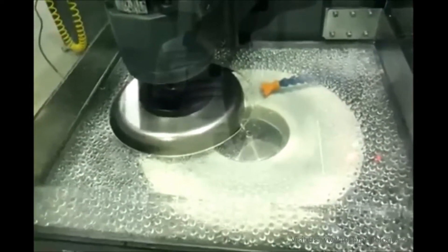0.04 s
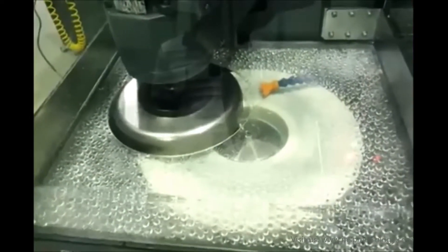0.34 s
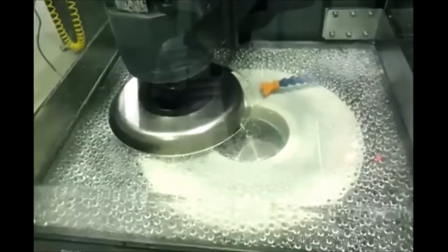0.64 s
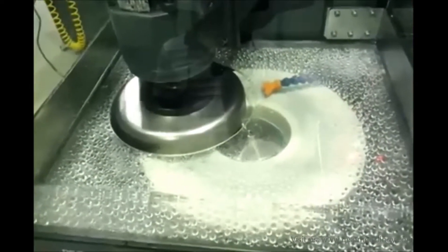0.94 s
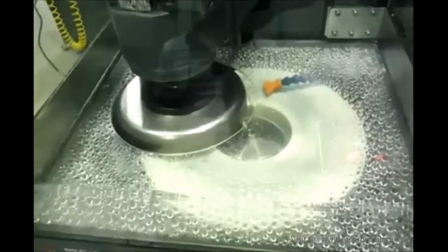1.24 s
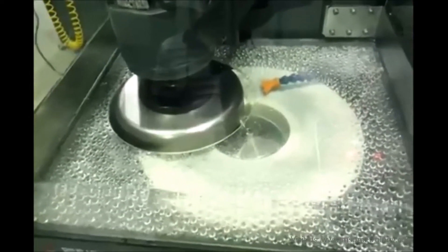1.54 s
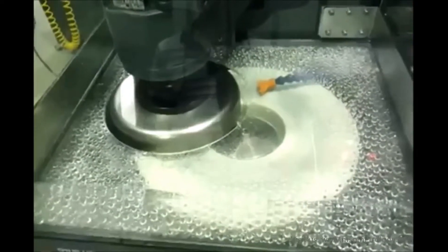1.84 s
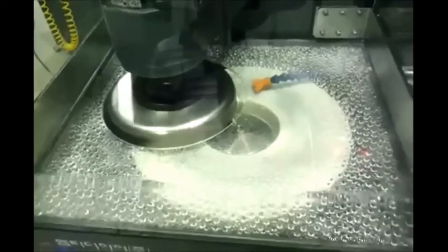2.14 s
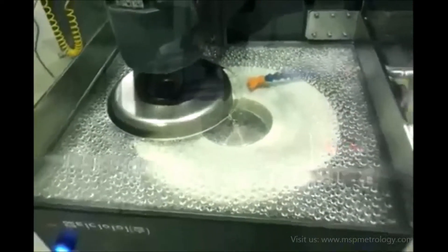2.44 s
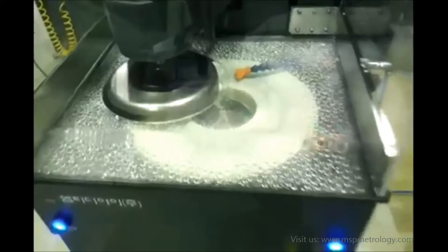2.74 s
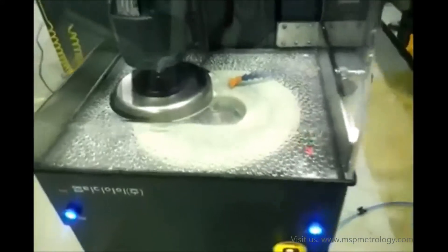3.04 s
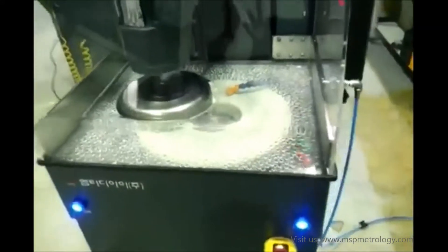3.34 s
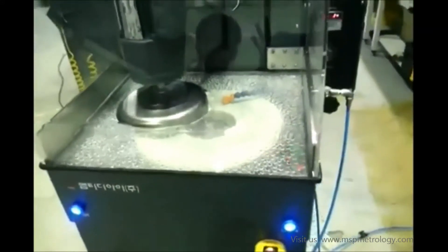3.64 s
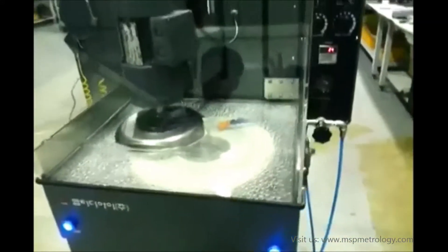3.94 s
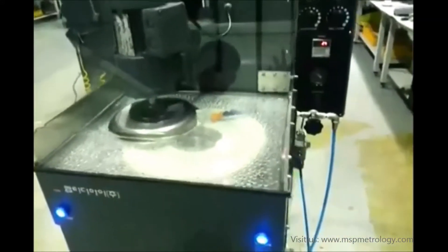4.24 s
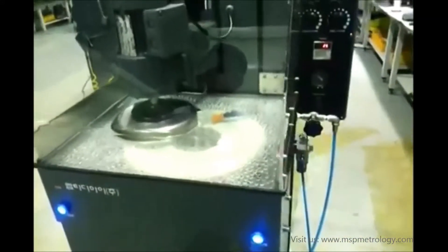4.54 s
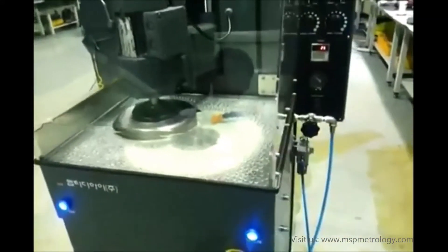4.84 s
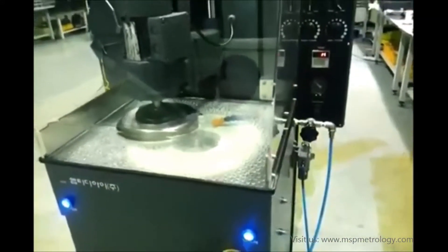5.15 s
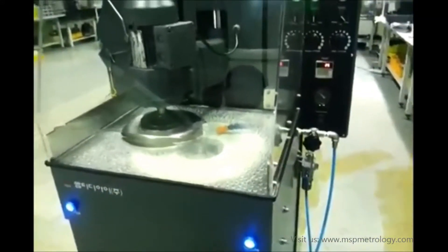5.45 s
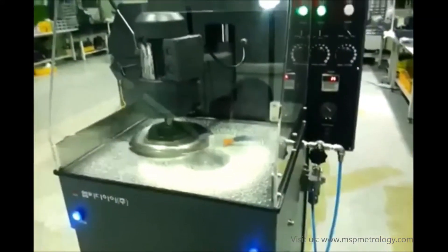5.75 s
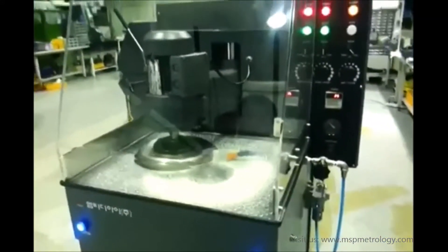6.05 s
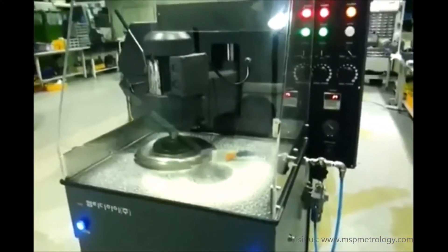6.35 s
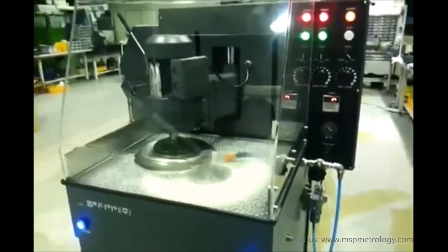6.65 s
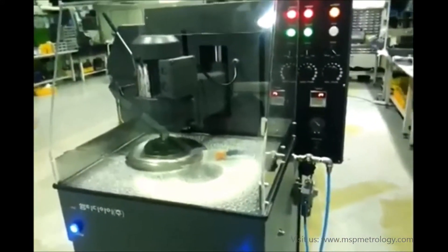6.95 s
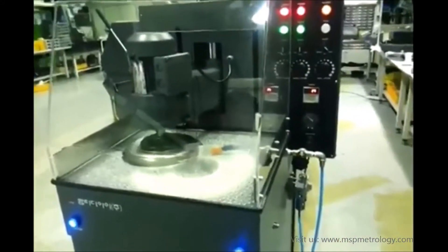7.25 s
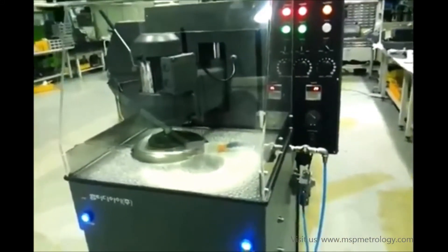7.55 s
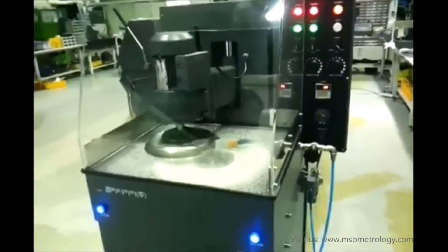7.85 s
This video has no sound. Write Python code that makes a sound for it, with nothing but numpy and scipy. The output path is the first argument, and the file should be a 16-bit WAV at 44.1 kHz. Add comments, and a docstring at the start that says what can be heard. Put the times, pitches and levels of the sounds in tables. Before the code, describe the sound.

A large polishing machine runs in a workshop with a throbbing gear hum, a high motor whine and wet, squeaky rubbing.

```python
"""A lapping machine polishes under running slurry in a workshop. From the start its geared drive hums,
throbs and rattles once a turn, the inverter makes the motor whine at 6 and 9 kHz, a fan sings, and the
wet plate rubs, scrapes and squeaks inside a ringing steel tub. From about 2 to 5 s the listener steps
back from the plate, and the whine swells and fades. One sharp tick at 4.9 s; the machine runs on."""
import sys
import numpy as np
from scipy.fft import rfft, irfft, next_fast_len
from scipy.io import wavfile
from scipy.ndimage import map_coordinates

SR = 44100
rng = np.random.default_rng(int(sys.argv[2]) if len(sys.argv) > 2 else 0)


def file_out(sig):
    """Save sig as 16-bit WAV at sys.argv[1]."""
    # one column per channel
    cols = np.atleast_2d(sig).T
    # limit, then scale
    lim = np.clip(cols, -1, 1)
    pcm = np.round(lim * 32767).astype(np.int16)
    wavfile.write(sys.argv[1], SR, pcm)


N = 348831
TIME_S = np.arange(N) / SR
SHAFT_HZ, FIRST_TURN_S = 10.1225, .01


def amp(db):
    return 10 ** (np.asarray(db) / 20)


def curve(rows):
    """Rows of (seconds, value), interpolated to every sample."""
    return np.interp(TIME_S, *np.transpose(rows))


def wobble(knots_per_s):
    """Smooth random curve."""
    knots = rng.standard_normal(int(N * knots_per_s / SR) + 4)
    coarse_s = np.linspace(0, N / SR, 2000)
    return np.interp(TIME_S, coarse_s, map_coordinates(knots, [coarse_s * knots_per_s]))


def filtered(x, response):
    """Apply a gain given as a function of Hz."""
    size = next_fast_len(N + SR // 4)
    return irfft(rfft(x, size) * response(np.fft.rfftfreq(size, 1 / SR)), size)[..., :N]


def colour(table):
    """Near and back gains of a spectrum table, interpolated on log frequency."""
    knots_hz, *columns_db = np.transpose(table)
    return lambda hz: amp([np.interp(np.log(hz + 1), np.log(knots_hz), db) for db in columns_db])


def blend(noises, response, back):
    """Two noises take the near and back colours and crossfade as the listener moves."""
    near, far = filtered(noises, response) * np.sqrt(SR / 2)
    return near * np.sqrt(1 - back) + far * np.sqrt(back)


def db_at(back, levels_db):
    """Level at the listener, from levels evenly spaced between near and back."""
    return np.interp(back, np.linspace(0, 1, len(levels_db)), levels_db)


def tone(cycles, rms_db, flutter_db):
    """Sine with a fluttering level."""
    return np.sqrt(2) * amp(rms_db + flutter_db * wobble(7)) * np.sin(2 * np.pi * (cycles + rng.random()))


# Frame rumble spectrum. Each row: frequency in Hz, density near and back in dB per Hz.
RUMBLE_SPECTRUM = [(15, -75, -77), (35, -70, -71), (60, -59.5, -61.5), (90, -66, -65.5), (135, -56.5, -61),
                   (195, -71, -73), (260, -66, -66), (380, -71, -73), (700, -75, -77), (1500, -100, -100)]

def frame_rumble(back):
    """The frame rumbles under the plate."""
    return blend(rng.standard_normal((2, N)), colour(RUMBLE_SPECTRUM), back)


# Steady tones: low drive tones, and weak inverter tones near 6, 9 and 12 kHz. Each row: frequency in Hz,
# flutter in dB, level near and back in dB.
STEADY_TONES = [(130, 1.5, -37, -49), (133.1, 2, -43, -45), (270, 1, -47, -50), (310.5, 1, -49, -54),
                (5924, 4, -45, -53), (6026, 4, -43, -53), (6282, 4, -55, -49), (6438.7, 4, -48, -44),
                (8974, 4, -56, -53), (9026, 4, -57, -53), (9131, 4, -58, -52), (11950, 1.5, -69, -60),
                (12050, 1.5, -69, -61), (12386, 1, -60, -62)]

def steady_tones(back):
    """Drive and inverter hold faint tones of steady pitch."""
    return sum(tone(hz * TIME_S, db_at(back, levels_db), flutter_db)
               for hz, flutter_db, *levels_db in STEADY_TONES)


# Fan level. Each row: time in seconds, level in dB.
FAN_LEVEL = [(0, -39), (1, -37.8), (2, -38.8), (2.6, -41), (3.25, -38.3), (3.6, -42), (4, -40.7),
             (4.4, -45), (5, -47), (6.5, -54), (7.2, -47), (7.9, -45)]
# Fan tones. Each row: frequency in Hz, offset from the fan level in dB.
FAN_PARTIALS = [(1465, -7), (1471.1, -5.5), (1477.6, -2)]

def fan():
    """Three close fan tones beat gently together."""
    return sum(tone(hz * TIME_S, curve(FAN_LEVEL) + db, flutter_db=.5) for hz, db in FAN_PARTIALS)


# Sharp ticks. Each row: start in seconds, peak in dB.
TICK_EVENTS = [(4.8686, -8)]

def tick(low_hz=5800, high_hz=10000, snap_t60_s=.005, tail_t60_s=.05, tail_db=-16):
    """A short, bright snap and its brief answer from the guards."""
    band = lambda hz: 1 / np.sqrt(1 + (low_hz / (hz + 1)) ** 12) / (1 + (hz / high_hz) ** 4)
    out = np.zeros(N)
    for start_s, peak_db in TICK_EVENTS:
        age_s = np.abs(TIME_S - start_s)
        decay = amp(-60 * age_s / snap_t60_s) + amp(tail_db - 60 * age_s / tail_t60_s)
        snap = filtered(rng.standard_normal(N) * (TIME_S >= start_s) * decay, band)
        out += amp(peak_db) * snap / np.abs(snap).max()
    return out


# Tub and guard resonances. Each row: centre and nominal width in Hz, density near and back in dB per Hz.
TUB_MODES = [(805, 42, -81, -84), (929, 34, -60.5, -63), (1187, 85, -61, -61), (1472, 66, -61, -60.5),
             (1764, 25, -53.5, -61.5), (1906, 160, -60.5, -59.5), (2118, 18.6, -51.5, -85),
             (2548, 36, -55, -61), (2770, 250, -70, -63), (3070, 29, -58.5, -58.5), (4360, 190, -67.5, -69)]

def tub_ring(back):
    """Tub and guards ring, excited by the slurry."""
    def response(hz):
        power = sum(amp([[near_db], [far_db]]) ** 2 / (1 + ((hz - mode_hz) / (.53 * width_hz)) ** 2) ** 2
                    for mode_hz, width_hz, near_db, far_db in TUB_MODES)
        return np.sqrt(power)
    return blend(rng.standard_normal((2, N)), response, back) * amp(.69 * wobble(18))


# Wet rubbing spectrum. Each row: frequency in Hz, density near and back in dB per Hz.
RUB_SPECTRUM = [(200, -64, -67.5), (545, -69.5, -72), (840, -68, -64), (1590, -73.5, -70.5),
                (2360, -65, -65), (3240, -66.5, -68), (4000, -66, -65.5), (4960, -69, -68.5),
                (6110, -64.5, -61), (6920, -64, -63.5), (8060, -73, -73), (8950, -71, -69.5),
                (10650, -76.5, -77.5), (10660, -91.5, -89), (12100, -90, -81), (12600, -106, -103),
                (14600, -116, -114)]
# Rubbing strength. Each row: time in seconds, gain on hiss and tub ring in dB.
RUB_GAIN = [(0, .4), (1.5, .4), (2.5, .4), (3.4, .8), (4.4, .4), (5.2, 0), (6.5, -.2), (7.9, -.7)]

def wet_rubbing(turn, back, ripple_db=1.3, swell_db=.72, lead_turns=.17):
    """Slurry hisses under the pad, swelling just before each turn, and excites the tub."""
    def response(hz):
        # Reflections off the guards ripple the spectrum, differently at each place.
        grid_hz = np.arange(0, SR / 2, 45)
        ripple = np.array([np.interp(hz, grid_hz, row) for row in rng.standard_normal((2, len(grid_hz)))])
        return colour(RUB_SPECTRUM)(hz) * amp(ripple_db * ripple)
    swell = amp(swell_db * np.cos(2 * np.pi * (turn + lead_turns)) + .59 * wobble(14))
    hiss = blend(rng.standard_normal((2, N)), response, back) * swell
    return amp(curve(RUB_GAIN)) * (hiss + tub_ring(back))


def stick_slip(events, length_s, width_hz, length_spread=.45):
    """The work sticks and slips: a narrow-band noise burst for each (seconds, Hz, dB)."""
    size = SR // 10
    lag_s, bins_hz = (np.arange(size) - size // 2) / SR, np.fft.rfftfreq(size, 1 / SR)
    out = np.zeros(N + 3 * size)
    for centre_s, hz, db in events:
        burst_s = length_s * np.exp(length_spread * rng.standard_normal())
        envelope = np.exp(-(lag_s / burst_s) ** 2)
        band = np.exp(-((bins_hz - hz) / width_hz) ** 2)
        rasp = irfft(rfft(rng.standard_normal(size)) * band, size) * envelope
        start = size // 2 + round(centre_s * SR)
        out[start:start + size] += amp(db) * rasp * np.linalg.norm(envelope) / np.linalg.norm(rasp)
    return out[size:size + N]


# Scrapes that stand out. Each row: time in seconds, pitch in Hz, level in dB.
SCRAPE_ACCENTS = [(.679, 4300, -32.5), (1.462, 4300, -36), (1.576, 3900, -33), (2.185, 3700, -33.5),
                  (3.32, 4100, -36), (6.322, 4220, -33.5), (6.445, 4350, -33.5), (6.513, 3750, -33),
                  (6.61, 4100, -34.5), (7.292, 4030, -34), (7.4, 4120, -37)]

def scrapes(place_turns=.8, pitch_hz=4000, level_db=-41.5):
    """Grit scrapes under the work late in every turn, each time at its own pitch."""
    times_s = np.arange(FIRST_TURN_S + place_turns / SHAFT_HZ, N / SR, 1 / SHAFT_HZ)
    jitter_s, jitter_hz, jitter_db = rng.normal(0, (.017, 210, 2), (len(times_s), 3)).T
    events = zip(times_s + jitter_s, pitch_hz + jitter_hz, level_db + jitter_db)
    return stick_slip([*events, *SCRAPE_ACCENTS], length_s=.017, width_hz=220)


# Grip of the work on the plate. Each row: time in seconds, level of the turn's first squeak in dB.
GRIP_LEVEL = [(0, -37), (2.35, -38), (2.7, -33.5), (4.1, -35), (5.7, -33.5), (6.3, -34.5), (7.05, -34.5),
              (7.4, -38), (7.9, -39)]
# Squeaks that stand out. Each row: time in seconds, pitch in Hz, level in dB.
SQUEAK_ACCENTS = [(2.579, 1900, -27), (2.632, 1880, -31), (2.695, 1890, -31), (2.773, 1880, -28.5),
                  (2.823, 1890, -28.5), (2.965, 1920, -30), (3.066, 1880, -28.5), (3.225, 1880, -31),
                  (3.369, 1880, -29), (3.49, 1880, -31), (3.572, 1880, -28), (4.048, 1910, -28.5),
                  (4.37, 1960, -31), (4.455, 1890, -30.5), (4.55, 1960, -30), (4.85, 1970, -32.5),
                  (5.048, 1880, -31), (5.148, 1890, -26.5), (5.645, 1930, -30), (6.632, 1990, -32),
                  (6.93, 1870, -31), (7.027, 1880, -30.5)]

def squeaks(pitch_hz=1868, rise_hz_per_s=13.2, second_turns=.46, second_db=-7):
    """The work squeaks twice a turn, as loud as it grips the plate."""
    turns_s = np.arange(FIRST_TURN_S, N / SR, 1 / SHAFT_HZ)
    events = list(SQUEAK_ACCENTS)
    for times_s, offset_db in [(turns_s, 0), (turns_s + second_turns / SHAFT_HZ, second_db)]:
        jitter_s, jitter_hz, jitter_db = rng.normal(0, (.004, 22, .6), (len(times_s), 3)).T
        hz = pitch_hz + rise_hz_per_s * times_s + jitter_hz
        db = np.interp(times_s, *np.transpose(GRIP_LEVEL)) + offset_db - jitter_db
        events += zip(times_s + jitter_s, hz, db)
    return stick_slip(events, length_s=.0094, width_hz=50)


def tooth_knock(turn, back, pitch_hz=530, place_turns=.26, length_s=.019, near_db=-39, far_db=-38):
    """A worn tooth knocks the gearbox at the same place in every turn."""
    lag_s = ((turn - place_turns + .5) % 1 - .5) / SHAFT_HZ
    envelope = amp(db_at(back, (near_db, far_db))) * np.exp(-(lag_s / length_s) ** 2)
    return np.sqrt(2) * envelope * np.sin(2 * np.pi * pitch_hz * lag_s)


# Gear rattle spectrum. Each row: frequency in Hz, density near and back in dB per Hz.
RATTLE_SPECTRUM = [(30, -80, -77.5), (70, -64.5, -65.5), (140, -64, -64.5), (205, -73, -73),
                   (322, -66, -68), (371, -68, -70), (513, -64, -67), (620, -66, -65.5),
                   (900, -64.5, -67.5), (1350, -68.5, -67), (1710, -65.5, -70), (1890, -64.5, -65),
                   (2350, -76, -72), (4000, -114, -118)]
# Gear load. Each row: time in seconds, gain on the rattle in dB.
LOAD_GAIN = [(0, 0), (2.2, 0), (2.9, .8), (3.6, .8), (4.6, 0), (6.6, -.3), (7.9, -1)]

def gear_rattle(turn, back, repeat_share=.8):
    """Much the same tooth faults pass every turn, giving a dense comb of lines."""
    size = int(SR / SHAFT_HZ)
    one_turn = rng.standard_normal((2, size))
    one_turn /= np.sqrt(np.mean(one_turn ** 2, axis=1, keepdims=True))
    faults = one_turn[:, (turn * size).astype(int) % size]
    teeth = np.sqrt(repeat_share) * faults + np.sqrt(1 - repeat_share) * rng.standard_normal((2, N))
    return amp(curve(LOAD_GAIN)) * blend(teeth * amp(1.4 * wobble(25)), colour(RATTLE_SPECTRUM), back)


# Strong gear tones. Each row: multiple of the shaft rate, level near, halfway and back in dB before trim.
GEAR_ORDERS = [(5, -49, -52, -55), (6, -46, -52, -54), (11, -47, -50, -50), (13, -50, -44, -58),
               (14, -53, -46, -55), (15, -40, -39, -38.5), (16, -45, -46, -47), (17, -50, -51, -52),
               (32, -51, -53, -56), (33, -48, -50, -52), (42, -49, -40, -43.5), (44, -47, -57, -59),
               (48, -49, -56, -52), (50, -56, -50, -50), (51, -48, -50, -51), (52, -48, -49, -54),
               (53, -51, -52, -48), (54, -49, -48, -46), (59, -49, -52, -56), (60, -46, -47, -45),
               (70, -44, -45, -52), (71, -56, -48, -49), (72, -56, -47, -51), (74, -55, -46, -56),
               (76, -50, -44, -53), (79, -48, -41, -45), (80, -48, -41, -42.5), (82, -49, -46, -48),
               (85, -51, -57, -52), (92, -46, -49, -48), (93, -47, -53, -52), (94, -34.5, -35.5, -40.5),
               (111, -46, -49, -53), (117, -50, -55, -62), (150, -59, -53, -53), (175, -47, -60, -63),
               (178, -50, -55, -53), (184, -55, -51, -57)]

def gear_tones(turn, back, drift_cycles=.07, trim_db=-.15):
    """Strong shaft harmonics drift against each other as the listener moves."""
    return sum(tone(order * turn + drift_cycles * back * wobble(4),
                    db_at(back, levels_db) + trim_db, flutter_db=1)
               for order, *levels_db in GEAR_ORDERS)


# Where the gears bind or run slack. Each row: place and width in turns, load change, mesh lead in teeth.
MESH_BINDS = [(.09, .105, .64, .01), (.2, .05, 0, -.05), (.4, .06, -.19, .06), (.47, .06, 0, -.11),
              (.7, .09, .12, .04), (.83, .08, -.5, -.05), (.93, .085, -.26, .17)]
# Gear hum. Each row: time in seconds, level in dB before gain.
HUM_LEVEL = [(0, -25.3), (1.7, -24.8), (2.7, -25.3), (3.2, -26.6), (4, -26.3), (5, -26.7), (7.9, -27.1)]

def gear_hum(turn, mesh_order=26, gain_db=3, sway_hz=3.105, first_sway_s=.052, sway_db=-12.5):
    """The mesh hums, throbbing and slipping where it binds; the hum sways about three times a second."""
    place, width, load_change, lead_teeth = np.transpose(MESH_BINDS)
    contact = np.exp(-(((turn[:, None] - place + .5) % 1 - .5) / width) ** 2)
    mesh = (1 + contact @ load_change) * np.sin(2 * np.pi * (mesh_order * turn + contact @ lead_teeth))
    sway_cycles = sway_hz * (TIME_S - first_sway_s)
    sway_tone = amp(sway_db) * np.sin(2 * np.pi * (mesh_order * turn + sway_cycles))
    return amp(curve(HUM_LEVEL) + gain_db + .3 * wobble(11)) * (mesh + sway_tone)


# Inverter tones above, below and at twice the carrier, and a thin whistle above three times the carrier.
# Each row: time in seconds, level in dB.
UPPER_LEVEL = [(0.0, -19.6), (1.9, -18.0), (2.2, -21.7), (2.3, -17.8), (2.45, -22.1), (2.7, -19.2),
               (3.45, -31), (3.54, -46), (3.59, -30), (3.68, -25), (3.85, -27), (4.05, -24), (4.75, -30.2),
               (5.1, -36.1), (5.5, -30.6), (5.75, -35.5), (6.0, -52.2), (6.6, -29.5), (7.4, -27.0),
               (7.89, -28.3)]
LOWER_LEVEL = [(0.0, -36.2), (1.45, -32.4), (1.8, -33.7), (2.25, -29.2), (3.15, -26.8), (3.42, -33),
               (3.63, -37), (3.78, -29), (3.9, -27.5), (4.2, -30.5), (4.6, -24.6), (7.89, -33.7)]
CENTRE_LEVEL = [(0, -38), (2.2, -40), (2.75, -34), (3, -41), (3.4, -35), (3.52, -47), (3.65, -35),
                (3.95, -41), (4.25, -31.5), (5.1, -31.5), (5.7, -45), (6.7, -37), (7.9, -34)]
WHISTLE_LEVEL = [(0, -46.0), (2.3, -46.1), (2.75, -41.2), (3.3, -45.2), (3.7, -36.5), (4.1, -44.9),
                 (4.6, -34.4), (5.3, -44.8), (7.89, -44.1)]
# Weaker inverter tones. Each row: carrier multiple, supply multiple, level near, halfway and back in dB.
WEAK_SIDEBANDS = [(3, -5, -57, -50, -45.5), (3, -3, -47.5, -44, -44)]

def inverter_whine(back, carrier_hz=3000, supply_hz=26.2, fade_db=1.6):
    """Switching tones beat together, swelling and fading as the listener crosses their standing waves."""
    strong = [(2, 2, curve(UPPER_LEVEL)), (2, -2, curve(LOWER_LEVEL)),
              (2, 0, curve(CENTRE_LEVEL)), (3, 3, curve(WHISTLE_LEVEL))]
    weak = [(harmonic, sideband, db_at(back, levels_db) + fade_db * np.sqrt(back) * wobble(3))
            for harmonic, sideband, *levels_db in WEAK_SIDEBANDS]
    out = np.zeros(N)
    for harmonic, sideband, db in strong + weak:
        hz = harmonic * carrier_hz + sideband * supply_hz
        # Small movements of the listener shift the phase and level of each short wave.
        shift_cycles = .08 * back * wobble(9)
        out += tone(hz * TIME_S + shift_cycles, db, flutter_db=.3 + .7 * back)
    return out


# Listener's path. Each row: time in seconds, place from 0 (at the plate) to 1 (a few steps back).
LISTENER_PATH = [(0, 0), (2.1, .02), (2.8, .45), (4, .6), (5.2, 1), (7.9, 1)]

def scene():
    """Drive, plate and tick at the listener's moving place, alike in both channels."""
    back = curve(LISTENER_PATH)
    turn = SHAFT_HZ * (TIME_S - FIRST_TURN_S) + .0004 * wobble(4)
    gearbox = gear_hum(turn) + tooth_knock(turn, back) + gear_rattle(turn, back) + gear_tones(turn, back)
    drive = gearbox + fan() + steady_tones(back) + inverter_whine(back)
    plate = wet_rubbing(turn, back) + frame_rumble(back) + squeaks() + scrapes()
    return np.array([drive + plate + tick()] * 2)


def record(dry):
    """Nothing sounds above 15 kHz."""
    return filtered(dry, lambda hz: hz < 15000)


dry = scene()
out = record(dry)
file_out(out)
```